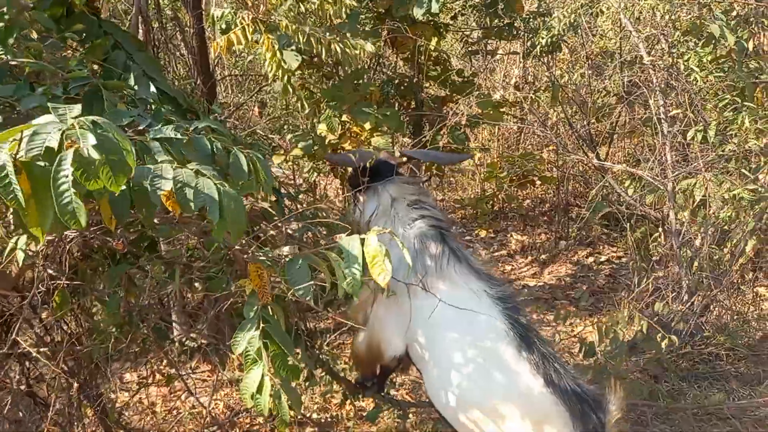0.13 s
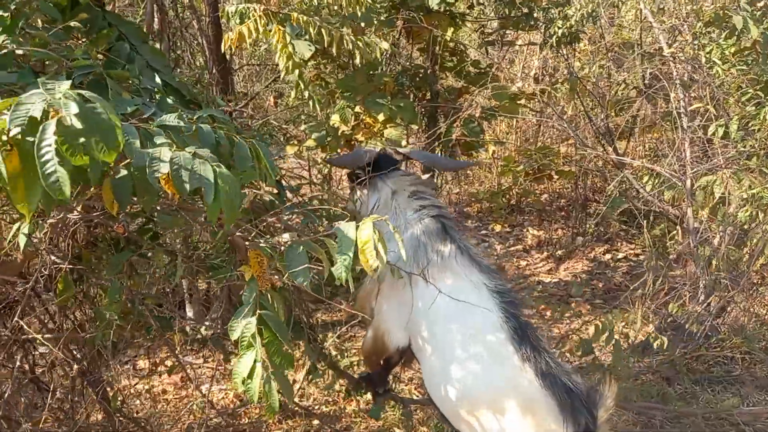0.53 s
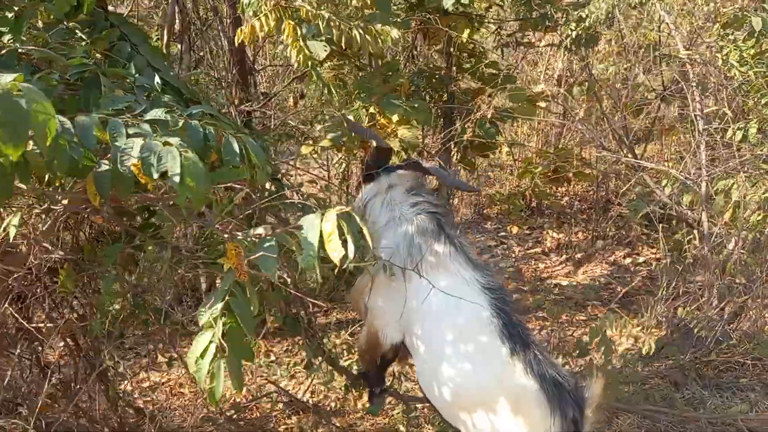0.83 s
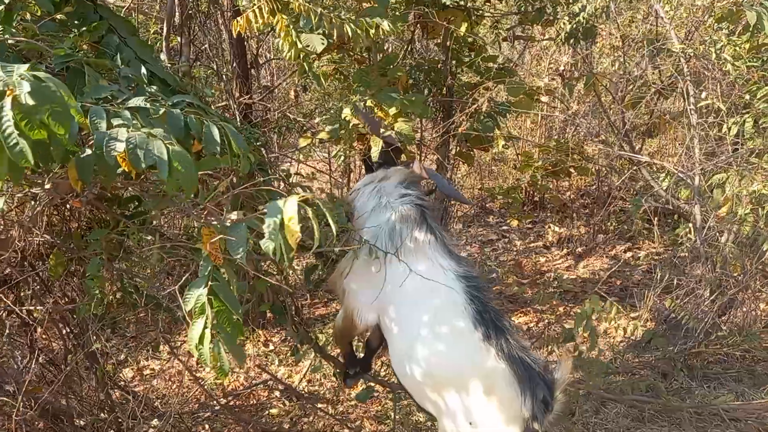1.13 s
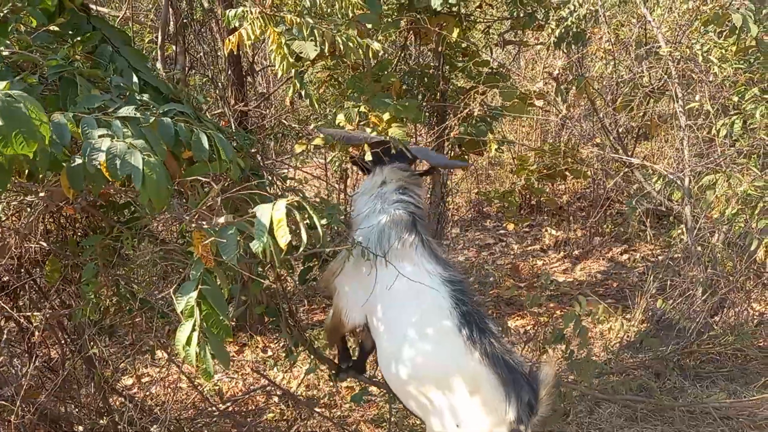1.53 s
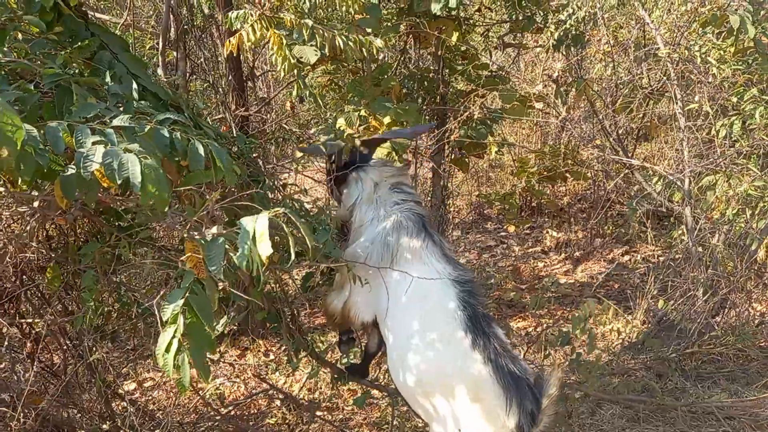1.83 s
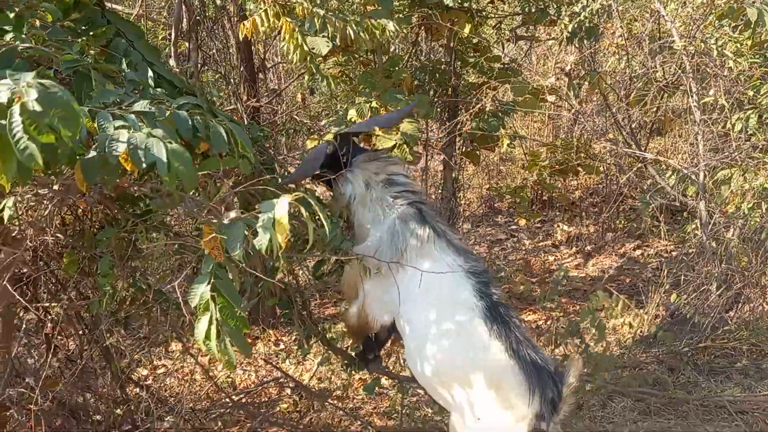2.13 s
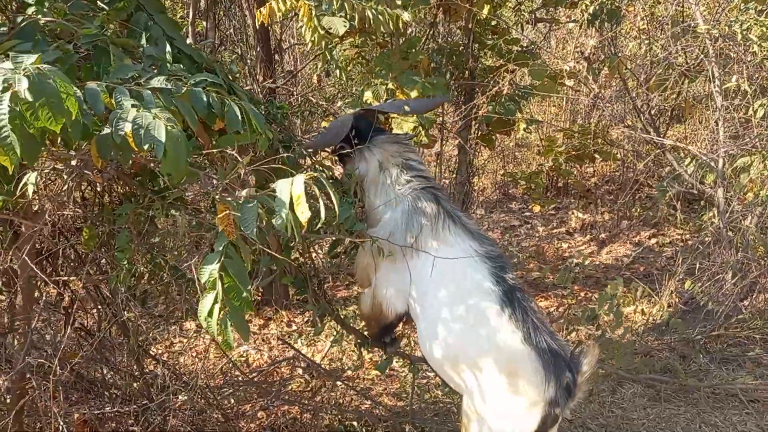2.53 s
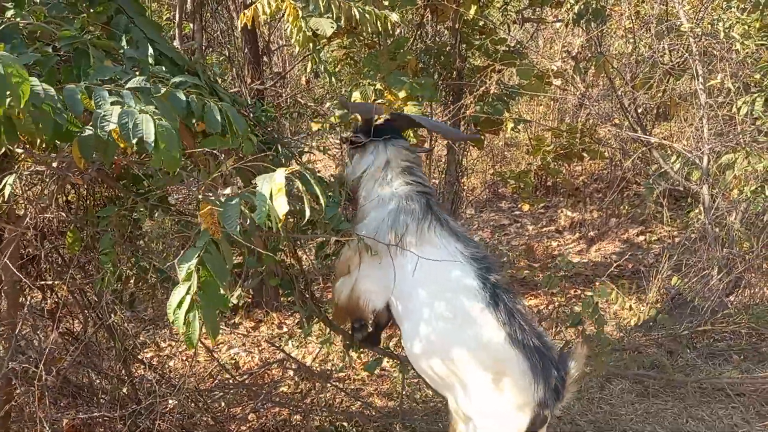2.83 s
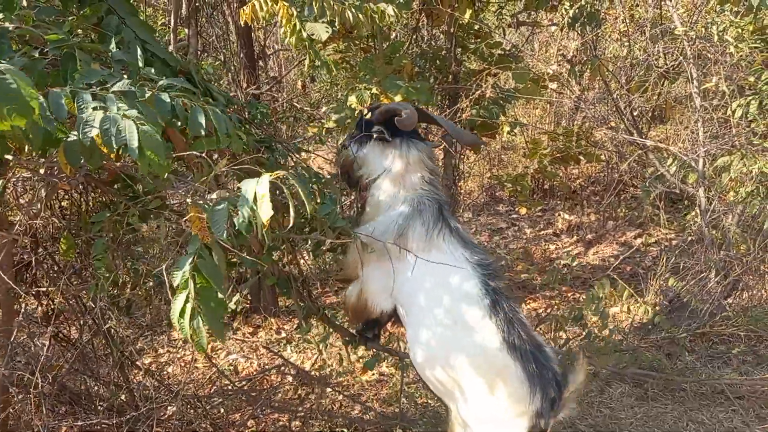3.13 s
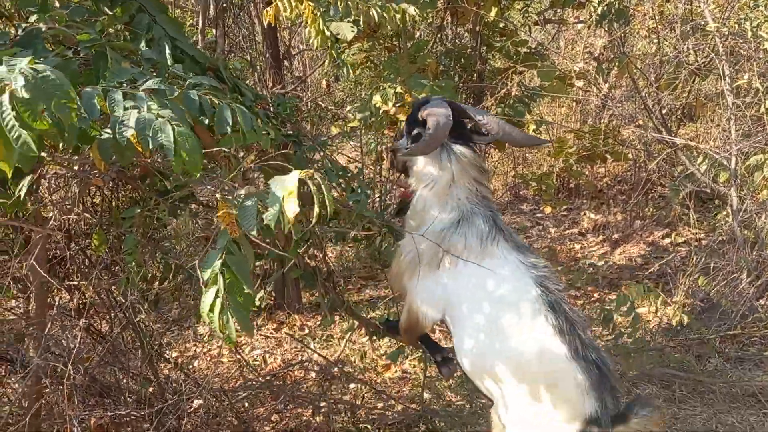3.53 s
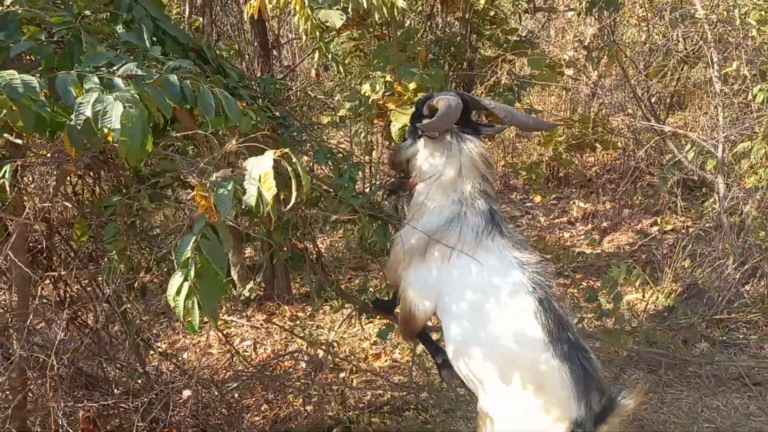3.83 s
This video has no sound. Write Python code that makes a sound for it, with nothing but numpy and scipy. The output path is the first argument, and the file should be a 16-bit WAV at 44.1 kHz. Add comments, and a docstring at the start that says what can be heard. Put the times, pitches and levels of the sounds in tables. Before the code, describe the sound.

Close stereo pickup outdoors: uneven neck-bell clanks with thin high tinkles, a quieter middle with faint far bell notes, then a strong double clank, leaf tearing and brushing, over a faint low pulsing.

```python
"""The sheet-metal neck bell of a goat browsing in dry woodland: uneven clapper blows excite modes the neck damps.
A small bell and single high partials ring as decaying tones; a dull bell sounds far off.
To the right leaves rustle as grainy coloured noise, and tears and snaps are short decaying noise bursts.
Underneath, falling knocks and low puffs form a soft double thud, five a second, perhaps a slow engine far away.
"""
import sys
import numpy as np
from scipy import signal
from scipy.fft import rfft, irfft, next_fast_len
from scipy.io import wavfile
from scipy.ndimage import uniform_filter1d, map_coordinates

SR = 44100
rng = np.random.default_rng(int(sys.argv[2]) if len(sys.argv) > 2 else 0)


def file_out(sig):
    """Save sig as 16-bit WAV at sys.argv[1]."""
    # one column per channel
    cols = np.atleast_2d(sig).T
    # limit, then scale
    lim = np.clip(cols, -1, 1)
    pcm = np.round(lim * 32767).astype(np.int16)
    wavfile.write(sys.argv[1], SR, pcm)


N = 176400  # samples, 4 s


def amp(db):
    """Logarithmic level: decibels become an amplitude ratio."""
    return 10 ** (np.asarray(db) / 20)


def unit(x):
    """Power normalisation: the signal is scaled to rms 1."""
    return x / np.sqrt(np.mean(x ** 2) + 1e-20)


def clock():
    """Uniform sampling: the time of every sample in seconds."""
    return np.arange(N) / SR


def curve(rows):
    """Linear interpolation: (time_s, value) rows are joined by straight lines."""
    return np.interp(clock(), *np.transpose(rows))


def wobble(rate):
    """Band-limited fluctuation: a smooth curve through random knots, rate of them a second."""
    knots = rng.standard_normal(int(N * rate / SR) + 4)
    return map_coordinates(knots, [clock() * rate])


def pan(db, lead=0):
    """Stereo level and phase difference: left minus right in dB, left lead in rad; gains average 1."""
    gains = amp(np.array([[db], [-db]]) / 2)
    gains = gains / gains.mean()
    if not lead:
        return gains
    return gains * np.exp(.5j * lead * np.array([[1], [-1]]))


def coloured(x, points):
    """Spectral shaping: (frequency_hz, level_db) points are joined on a log-frequency axis."""
    hz, db = np.transpose(points)
    bins_hz = np.fft.rfftfreq(N, 1 / SR)
    gain = amp(np.interp(np.log(bins_hz + 1), np.log(hz), db))
    return irfft(rfft(x) * gain, N)


def noise(spectrum, alike):
    """Interchannel coherence: two independent noises are mixed to a given likeness, at rms 1."""
    a, b = coloured(rng.standard_normal((2, N)), spectrum)
    angle = np.arccos(np.clip(alike, -1, 1)) / 2
    left = a * np.cos(angle) + b * np.sin(angle)
    right = a * np.cos(angle) - b * np.sin(angle)
    return unit(np.array([left, right]))


def burst(s, db, length):
    """Impulsive excitation: a sudden onset decays exponentially with time constant length in s."""
    age = clock() - s
    return amp(db) * (age >= 0) * np.exp(-np.clip(age / length, 0, 50))


def patchy(x, depth_db):
    """Time-frequency modulation: smoothed random patches of gain vary the noise."""
    spectra = signal.stft(x, nperseg=512)[2]
    field = rng.standard_normal(spectra.shape[1:])
    field = uniform_filter1d(field, size=7, axis=0)
    field = uniform_filter1d(field, size=12, axis=1)
    return unit(signal.istft(spectra * amp(depth_db * unit(field)), nperseg=512)[1][:, :N])


def crackle(rate, life_s, spread_db, share):
    """Random impulse train: many tiny decaying leaf contacts add to a steady part in power."""
    heights = amp(spread_db * np.minimum(rng.exponential(size=N), 4))
    hits = (rng.random(N) < rate / SR) * heights
    grains = unit(signal.lfilter([1], [1, -np.exp(-1 / (life_s * SR))], hits))
    share = np.clip(share, 0, 1)
    return np.sqrt(1 - share + share * grains ** 2)


# colour of the left channel's leaf sounds, mostly duller in the highs: frequency_hz, gain_db
LEFT_COLOUR = [(600, -3), (2000, -4), (2900, -13), (3700, -22.5), (4600, -20), (5700, -2.5), (7000, 2.5),
               (8300, -0.5), (9200, -7), (10000, -19), (12000, -20), (15000, -20.5)]


def from_right(x):
    """Channel colour: the left channel is filtered by frequency, the right is left alone."""
    return np.array([coloured(x[0], LEFT_COLOUR), x[1]])


WOOD_T60_S = 0.38


def woodland(x):
    """Diffuse scattering: trunks return a short decaying tail, modelled by convolution with noise."""
    age = clock()[:SR // 2]
    envelope = amp(-60 * age / WOOD_T60_S) * (1 - np.exp(-age / 0.015))
    tail = rng.standard_normal((2, len(age))) * envelope
    return signal.fftconvolve(x, tail / np.linalg.norm(tail[0]), axes=1)[:, :N]


# beats: start_s, level_db (reference for the parts of the thud)
THUDS = [(0.04, -46.5), (0.235, -45), (0.43, -48), (0.622, -47.5), (0.811, -49.5), (1, -45.5),
         (1.189, -47.5), (1.38, -46), (1.587, -48.5), (1.801, -48.5), (2.019, -50), (2.228, -47.5),
         (2.437, -49), (2.639, -47), (2.836, -48), (3.029, -46.5), (3.222, -45), (3.412, -44.5),
         (3.601, -46), (3.785, -44.5), (3.969, -48)]
# resonances after each knock: pitch_hz, level_db re beat, t60_s
THUD_RING = [(149.7, -8, 0.24), (267, -6.5, .12), (315, -6, 0.073)]
# steady rumble colour: frequency_hz, relative level_db per Hz
RUMBLE = [(20, -34.5), (40, -5.5), (65, -2), (110, -1), (155, 0), (200, -11), (255, -1), (330, -15),
          (450, -27), (1000, -34), (4000, -43.5)]
RUMBLE_DB, THUD_TOP_HZ = -65, 400
KNOCK_DB, KNOCK_HZ, KNOCK_END_HZ, KNOCK_FALL_S, KNOCK_S = -4, 351.4, 88, 0.0065, 0.0051
PUFF_DB, PUFF_HZ, PUFF_LEAD_S, PUFF_S = -6, 86.4, .039, 0.014


def thuds():
    """Transient and resonance: a low puff, then a falling knock and brief boom, over steady rumble."""
    t, out = clock(), np.zeros(N)
    phase_turns = rng.random((len(THUDS), 2 + len(THUD_RING)))
    for (s, db), (knock_phase, puff_phase, *ring_phases) in zip(THUDS, phase_turns):
        i = np.flatnonzero(abs(t - s) < .16)
        age = np.maximum(t[i] - s, 0)
        puff_age = t[i] - s + PUFF_LEAD_S
        # integral of the falling frequency
        fall = (KNOCK_HZ - KNOCK_END_HZ) * KNOCK_FALL_S * (1 - np.exp(-age / KNOCK_FALL_S))
        turns = KNOCK_END_HZ * age + fall
        knock = age / KNOCK_S * np.exp(1 - age / KNOCK_S) * np.sin(2 * np.pi * (turns + knock_phase))
        puff = np.exp(-(puff_age / PUFF_S) ** 2) * np.sin(2 * np.pi * (PUFF_HZ * puff_age + puff_phase))
        out[i] += amp(db + KNOCK_DB) * knock + amp(db + PUFF_DB) * puff
        for (hz, level, t60), phase in zip(THUD_RING, ring_phases):
            envelope = amp(db + level - 60 * age / t60) * (1 - np.exp(-age / KNOCK_S))
            out[i] += envelope * np.sin(2 * np.pi * (hz * age + phase))
    muffled = signal.sosfiltfilt(signal.butter(4, THUD_TOP_HZ, fs=SR, output="sos"), out)
    return muffled + amp(RUMBLE_DB) * noise(RUMBLE, alike=0.73)


# fine leaf hiss: time_s, level_db before FIZZ_DB
RUSTLE = [(0.0, -60), (0.53, -65), (0.69, -60.5), (0.93, -71), (1.17, -65.5), (1.29, -68.5), (1.71, -67),
          (1.89, -64.5), (2.19, -72.5), (2.39, -74), (2.57, -68), (3.02, -66.5), (3.17, -58), (3.31, -58),
          (3.65, -56.5), (3.91, -55), (4.0, -59)]
# coarser brushing: time_s, level_db before BRUSH_DB
BRUSH = [(0.0, -70), (0.56, -62), (1.12, -71.5), (1.32, -66), (1.65, -70.5), (1.92, -70), (2.25, -69),
         (2.57, -70.5), (2.94, -68), (3.14, -64.5), (3.33, -63), (4.0, -63.5)]
# hiss colour: frequency_hz, relative level_db per Hz
FIZZ = [(3000, -30.5), (7000, -29), (8700, -10), (10200, -3.5), (13000, -0.5), (16000, -4)]
# brushing colour: frequency_hz, relative level_db per Hz
FOLIAGE = [(300, -17), (650, -4.5), (850, -7.5), (1120, -3), (1600, -13.5), (2100, -2.5), (2800, -2),
           (3700, 8.5), (4700, 5), (5700, -2), (7000, -1), (8400, -6), (11000, -5), (15000, -15)]
FIZZ_DB, BRUSH_DB = 10, 12.5


def leaves():
    """Friction noise: fine hiss and coarser brushing of the pulled branch, both grainy."""
    fizz = patchy(noise(FIZZ, alike=.1), depth_db=2.0)
    fizz = fizz * crackle(rate=560, life_s=.0007, spread_db=1, share=0.43)
    brush = patchy(noise(FOLIAGE, alike=0.064), depth_db=3.5)
    brush = brush * crackle(rate=160, life_s=0.0034, spread_db=4.5, share=0.2)
    flutter_db = 1.0 * wobble(rate=30)
    foliage = fizz * amp(curve(RUSTLE) + FIZZ_DB) + brush * amp(curve(BRUSH) + BRUSH_DB)
    return from_right(amp(flutter_db) * foliage)


# tearing leaves and snapping stalks: start_s, level_db before SNAP_DB or WOODY_DB,
# decay time constant_s, woody_body_db added to the level
SNAPS = [(.017, -44.5, 0.009, -14), (.041, -45, 0.018, -10), (.543, -44.5, 0.004, -16),
         (0.577, -45.5, 0.01, -5), (0.616, -44, 0.0027, -1), (0.671, -45, 0.0099, -9),
         (0.682, -41, 0.0047, 4), (.701, -48.5, 0.0064, 8), (0.803, -43.5, .004, -11),
         (1.375, -48, 0.014, 2), (1.405, -43, .006, 1.5), (1.95, -49, 0.0016, -7),
         (2.182, -38.5, 0.0081, -19), (2.343, -40.5, 0.0053, -29), (2.351, -43.5, .004, -7),
         (2.49, -38.5, 0.008, -6), (2.502, -41.5, .006, -1), (2.595, -35.5, 0.0019, -7),
         (2.603, -44, 0.017, -7), (3.127, -46.5, 0.005, -17), (3.259, -36, 0.0055, -9),
         (3.304, -24, 0.0013, -6), (3.354, -44, 0.0023, 16), (3.397, -44.5, 0.007, 9),
         (3.546, -42, 0.0084, -2), (3.98, -40.5, .008, -11)]
# crack colour: frequency_hz, relative level_db
CRISP = [(500, -27.5), (2000, -37), (4000, 1), (5500, -6), (7000, -12), (8500, -10.5), (10500, -2),
         (13000, -2), (16000, -1)]
# stalk colour: frequency_hz, relative level_db
WOODY = [(300, -19), (1200, -7.5), (1800, -9.5), (2600, -7), (4000, 5), (6000, -13.5), (15000, -29.5)]
SNAP_ROUGH_DB, SNAP_DB, WOODY_DB = 2.5, 5, -1


def snaps():
    """Fracture noise: rough bursts of cracking, each with more or less of a stalk's woody body."""
    crisp = sum(burst(s, db, length) for s, db, length, _ in SNAPS)
    crisp = crisp * unit(amp(SNAP_ROUGH_DB * wobble(rate=1500)))
    woody = sum(burst(s, db + body, length) for s, db, length, body in SNAPS)
    cracks = amp(SNAP_DB) * crisp * noise(CRISP, alike=0.13)
    stalks = amp(WOODY_DB) * woody * noise(WOODY, alike=.4)
    return from_right(cracks + stalks)


PING_SWELL_S = 0.0013


def ping(s, hz, db, t60):
    """Damped vibration: one partial swells and dies."""
    age = np.maximum(clock() - s, 0)
    envelope = amp(db - 60 * age / t60) * (1 - np.exp(-age / PING_SWELL_S))
    return envelope * np.sin(2 * np.pi * hz * age)


# a dull bell far off: start_s, level_db
FAR_BLOWS = [(1.968, -61.5), (2.078, -67.5), (2.42, -72), (2.495, -63)]
FAR_HZ, FAR_T60_S = 677, 0.32


def far_bell():
    """Single-mode decay: a distant bell is reduced to a few dull, faint notes."""
    return sum(ping(s, FAR_HZ, db, FAR_T60_S) for s, db in FAR_BLOWS)


# single high partials, the small bell's pings at 5928 Hz and others of the neck bell:
# start_s, pitch_hz, level_db
PINGS = [(0.245, 5928, -45), (0.393, 5928, -45.5), (0.628, 5928, -48.5), (1.16, 5928, -56.5),
         (1.39, 5928, -60), (1.57, 5928, -56), (2.42, 5928, -56.5), (2.94, 5928, -53), (3.391, 4377, -45),
         (3.44, 4377, -42), (3.977, 7526, -51), (3.977, 8333, -55)]
# partials of the idle small bell: pitch_hz, level_db before TINKLE_LEVEL
TINKLE = [(2410, -73.5), (2436, -70), (3050, -80), (4638, -75), (4712, -70), (4760, -73.5), (5925, -70),
          (6729, -80.5), (7714, -74.5), (10485, -75), (10560, -81)]
# fading of the tinkling: time_s, added level_db
TINKLE_LEVEL = [(0, 6), (.7, 2.5), (1.6, 2.5), (2.1, -10), (2.6, -10), (4, -10.5)]
PING_T60_S, TINKLE_T60_S = 0.29, 0.34
TINKLE_RATE, TINKLE_BLUR_RAD = 18, 0.42  # taps a second for each partial; phase wander


def small_bell():
    """Randomly excited resonance: faint tinkling blurred by phase wander, under single high partials."""
    age = clock()[:SR // 2]
    out = sum(ping(s, hz, db, PING_T60_S) for s, hz, db in PINGS) * pan(db=-5)
    for hz, db in TINKLE:
        taps = (rng.random(N) < TINKLE_RATE / SR) * rng.uniform(0.99, 1, (2, N))
        envelope = amp(-60 * age / TINKLE_T60_S) * (1 - np.exp(-age / 0.0029))
        ring = np.exp(2j * np.pi * hz * age) * envelope
        tone = signal.fftconvolve(taps, ring[None], axes=1)[:, :N]
        tone = tone * np.exp(1j * TINKLE_BLUR_RAD * wobble(rate=hz / 40))
        out = out + unit(tone.real) * amp(db + curve(TINKLE_LEVEL)) * pan(db=-8.5)
    return out


# clapper blows, the spot hit setting each mode group: start_s, swell_s at REF_HZ, t60_factor,
# hum_db, low_rim_db, high_rim_db, waist_db, clang_db, shimmer_db
BLOWS = [(-.03, 0.0078, 0.97, -46.5, -63, -48.5, -70, -65, -75),
         (.148, 0.01, 0.91, -25.5, -32, -43, -45.5, -39.5, -51),
         (.380, 0.0071, 0.73, -31, -47, -46, -49, -42, -59),
         (.571, 0.006, 0.56, -40.5, -55, -52, -65.5, -70, -78),
         (.899, 0.018, 1.12, -28, -43.5, -60.5, -56.5, -59, -54.5),
         (1.104, 0.0055, 0.69, -35.5, -56.5, -56, -65, -77, -76),
         (1.268, 0.006, 1.014, -33.5, -52.5, -43, -74, -47.5, -52.5),
         (1.680, 0.018, 0.6, -40, -72, -60, -75, -57, -63),
         (2.645, 0.015, 0.96, -31.5, -40, -54, -50.5, -59, -61.5),
         (2.945, 0.0076, 1.57, -24, -37, -39, -53, -49, -52),
         (3.197, 0.0049, 0.8, -17, -26.5, -43.5, -38.5, -34, -40),
         (3.243, 0.0064, 1.18, -22, -29.5, -41.5, -34, -34.5, -48.5),
         (3.768, .012, 0.097, -29.5, -60, -70, -76, -79, -78),
         (3.974, .010, 1, -36.5, -63, -80, -60, -75, -51.5)]
# bell modes: pitch_hz, level_db re group, t60_s before the blow's factor, group (0-5, rounded),
# left_minus_right_db, left_lead_rad
BELL = [(815.1, 0.5, 0.71, 0, -1.1, 0.4), (705, -26, 2.7, 1, -0.5, 0), (436, -43.5, 0.73, 0, -1.5, 1),
        (634, -36, 2.2, 0.5, 1, -1), (1075, -39.5, 1.9, 1, -6, 1), (1926.7, -0.5, 0.75, 1, -3.4, 0.28),
        (2064.3, -0.5, 2.1, 2, -5.5, 0.65), (3448, -1.5, 1.3, 3, -13, -.43),
        (3759, -1.5, .55, 4, -13, -.41), (3801, -5.5, .5, 4, -17, 0), (4377, 1, .7, 5, -13, 2),
        (4840, -6, .6, 5, -10, 1.8), (4914, -3, .4, 5, -9, 2.3), (5663, -10, .5, 5, -5, 1.8),
        (6164, -14, .45, 5, -6, 0), (6260, -14, .35, 5, -3.5, 1.5), (6724, -15.5, 0.37, 4, -4, 2.5)]
# the neck presses on the bell: start_s, length_s, loss_db per s at REF_HZ, pitch_rise (share of REF_HZ)
PRESSES = [(0.472, 0.083, 172, 0.00076), (.67, 0.05, 61, 0.00107), (1.506, .15, 53, .001),
           (1.762, .3, 176, .001), (3.413, 0.11, 165, 0.0386), (3.513, 0.11, 85, 0.00082)]
# clapper contact noise colour: frequency_hz, relative level_db
CLACK = [(300, -16), (800, -4.5), (2000, 5), (4000, -2), (7000, -15), (15000, -25.5)]
REF_HZ, NECK_TILT = 805, 0.35  # the exponent makes the neck damp high modes less
CONTACT_S, HANDOVER_S = 0.00093, 0.014  # onset and replacement time constants
WAVER_DB, BUZZ_DB, BUZZ_RATE = 0.72, -24, 310  # slow mode waver; fast roughness, knots a second
CLACK_DB, CLACK_T60_S = -16, .024


def bell():
    """Modal synthesis: blows replace the last ring, low modes swell slowly, the neck damps and sharpens."""
    t, out, clack = clock(), np.zeros((2, N)), np.zeros(N)
    loss_db = sum(rate * np.clip(t - s, 0, length) for s, length, rate, _ in PRESSES)
    rise = sum(share * np.clip((t - s) / length, 0, 1) for s, length, _, share in PRESSES)
    waver_db = [WAVER_DB * wobble(rate=22) for _ in BELL]
    ends = [row[0] for row in BLOWS[1:]] + [N / SR]
    for (s, swell, hold, *levels), end in zip(BLOWS, ends):
        i = np.flatnonzero((t >= s) & (t < end + 10 * HANDOVER_S))
        age = t[i] - s
        replaced = np.exp(-np.maximum(t[i] - end, 0) / HANDOVER_S)
        bend_turns = REF_HZ * np.cumsum(rise[i] - rise[i[0]]) / SR  # same shift in Hz for all modes
        for (hz, db, t60, group, side, lead), drift in zip(BELL, waver_db):
            size = amp(levels[int(round(group))] + db + drift[i] - 60 * age / (t60 * hold))
            swelling = 1 - np.exp(-age / swell * (hz / REF_HZ) ** 1.43)
            attack = swelling * (1 - np.exp(-age / CONTACT_S))
            damped = amp((loss_db[i[0]] - loss_db[i]) * (REF_HZ / hz) ** NECK_TILT) * replaced
            vibration = np.exp(2j * np.pi * (hz * age + bend_turns + rng.random()))
            out[:, i] += (pan(side, lead) * size * attack * damped * vibration).real
        # the clack follows the strongest group above the hum
        clack += burst(s, max(levels[1:]) + CLACK_DB, CLACK_T60_S / np.log(1000))
    out *= 1 + amp(BUZZ_DB) * np.array([wobble(BUZZ_RATE), wobble(BUZZ_RATE)])
    return out + clack * noise(CLACK, alike=0.87) * pan(db=-5.5)


WOOD_DB = -18.5


def scene():
    """Superposition: near bells and snaps excite the wood, over leaves, thuds and the far bell."""
    near = bell() + small_bell() + snaps()
    return near + amp(WOOD_DB) * woodland(near) + leaves() + thuds() + far_bell()


TOP_HZ = 16100


def record(dry):
    """Band limitation: no spectral component at or above TOP_HZ is kept."""
    size = next_fast_len(N + SR // 2)
    passed = np.fft.rfftfreq(size, 1 / SR) < TOP_HZ
    return irfft(rfft(dry, size) * passed, size)[:, :N]


dry = scene()
out = record(dry)
file_out(out)
```